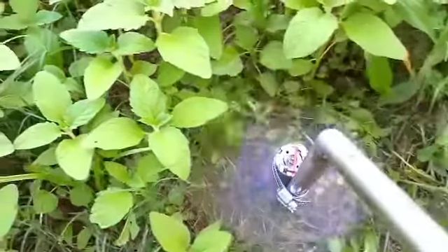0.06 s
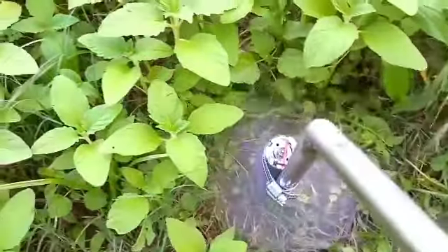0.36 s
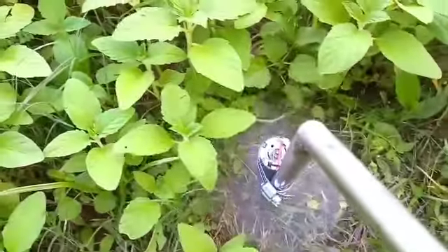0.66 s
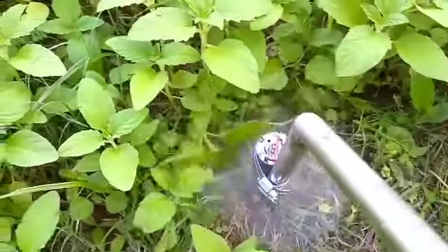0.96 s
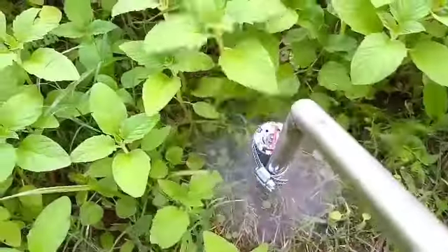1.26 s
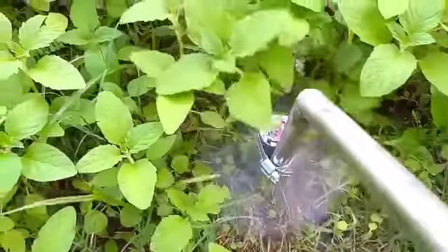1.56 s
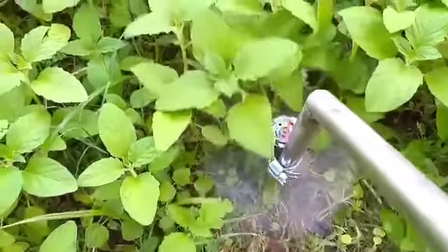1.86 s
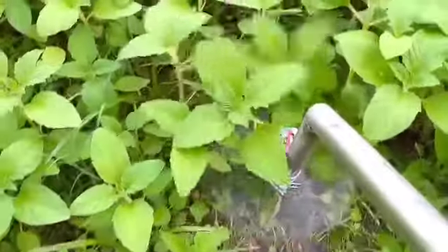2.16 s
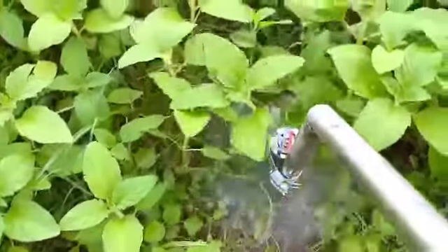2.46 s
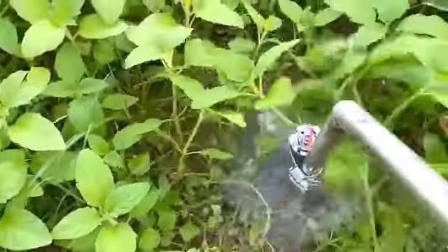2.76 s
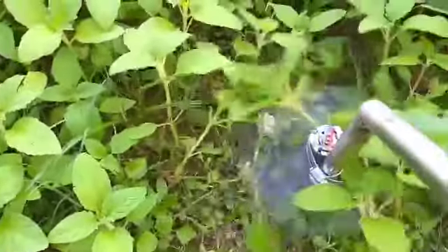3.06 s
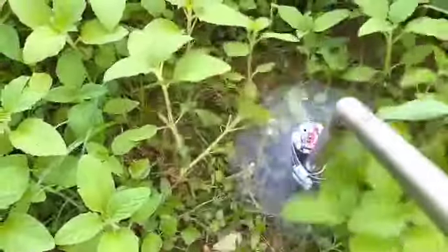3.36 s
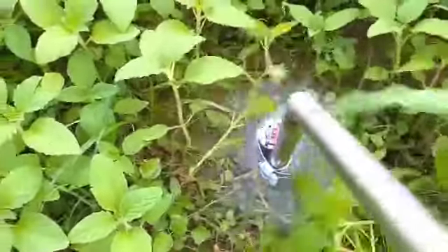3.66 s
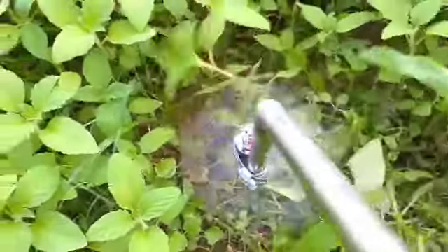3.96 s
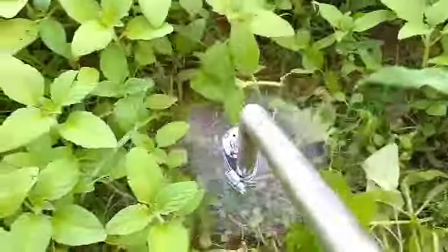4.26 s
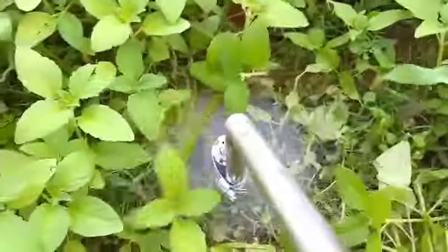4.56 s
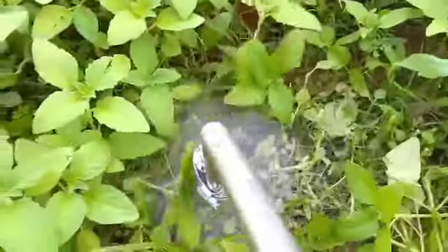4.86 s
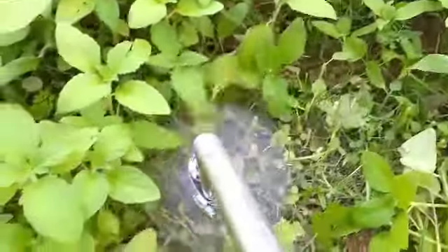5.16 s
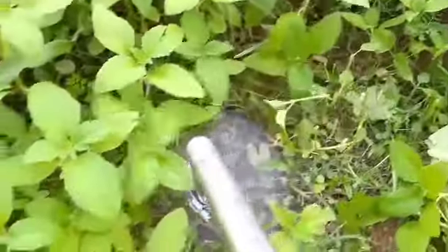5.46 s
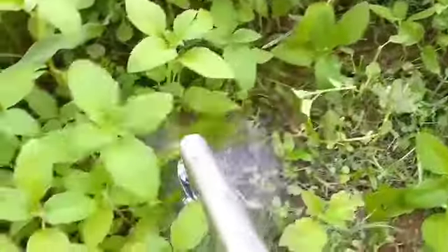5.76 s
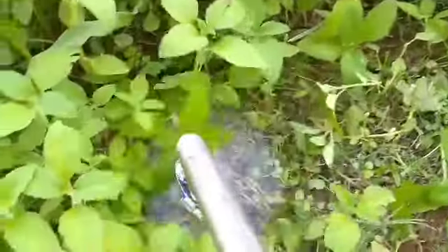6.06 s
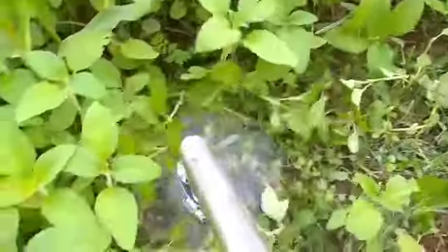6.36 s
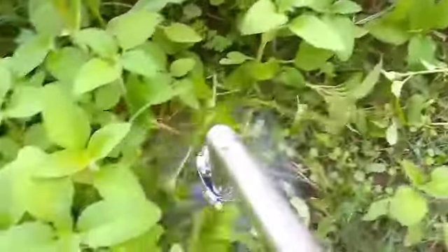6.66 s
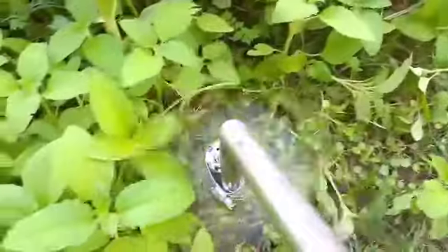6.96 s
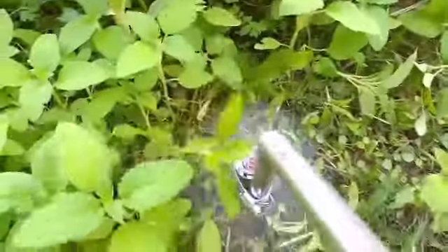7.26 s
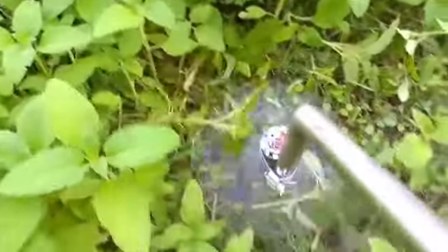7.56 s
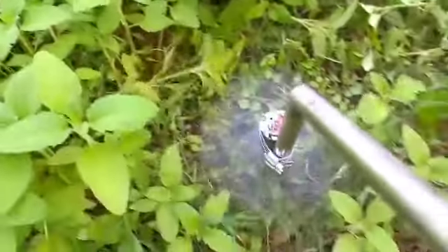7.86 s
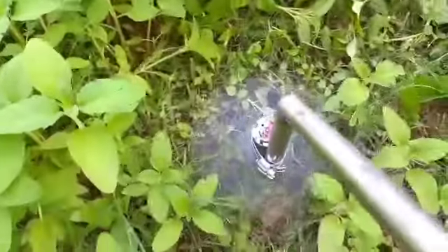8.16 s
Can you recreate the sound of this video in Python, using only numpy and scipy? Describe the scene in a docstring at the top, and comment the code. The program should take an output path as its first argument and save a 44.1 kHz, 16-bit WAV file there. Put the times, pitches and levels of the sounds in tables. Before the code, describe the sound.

Heard close up outdoors and leaning to the left, a spinning cutter chops leafy weeds without a pause. High metallic ringing and rattling ride over a scratchy, sizzling sound of torn leaves. Stalks knock against the cutter at irregular moments, with tiny squeals and a few dull bumps. The small electric motor's hum wavers from the start, grows stronger and cleaner midway, then sags again as the trimmer bites into more growth.

```python
"""Home-made grass trimmer in weeds

Outdoors, close to a pair of microphones, a small electric motor on a metal tube is swept through weeds.
The spinning cutter hums and sags under load; its chatter echoes along the tube and rings it in a row
of close lines. Leaves are shredded with a grainy rasp that grows with the thickness of the weeds and
with each tuft, and thicker stalks knock against the cutter."""
import sys
import numpy as np
from scipy import signal
from scipy.fft import rfft, irfft
from scipy.io import wavfile
from scipy.ndimage import uniform_filter1d

SR = 44100
rng = np.random.default_rng(int(sys.argv[2]) if len(sys.argv) > 2 else 0)


def digitize_waveform(pressure):
    """Quantize a signal to 16-bit integers and store it at the path in sys.argv[1].

    Rows of a 2-D input are taken as channels; values are limited to [-1, 1].
    """
    field = np.atleast_2d(pressure).T
    bounded = np.clip(field, -1, 1)
    quanta = np.round(bounded * 32767).astype(np.int16)
    wavfile.write(sys.argv[1], SR, quanta)


N = 366912
TIME = np.arange(N) / SR
FREQS = np.maximum(np.arange(N // 2 + 1) * SR / N, 1)


def from_db(db):
    """Decibels to gain."""
    return 10 ** (np.asarray(db) / 20)


def rms_one(x):
    """Scale so that the mean of the channels has rms 1."""
    return x / np.sqrt(np.mean(np.atleast_2d(x).mean(axis=0) ** 2) + 1e-20)


def over_hz(points):
    """A table of frequencies read at every bin."""
    hz, value = np.transpose(points)
    return np.interp(np.log(FREQS), np.log(hz), value)


def drift(rate_hz):
    """A smooth random wander with spread 1."""
    return rms_one(irfft(rfft(rng.standard_normal(N)) / (1 + (FREQS / rate_hz) ** 2), N))


def swell(s, half_s):
    """A smooth rise and fall around one moment."""
    return np.exp(-np.minimum(((TIME - s) / half_s) ** 2 / 2, 20))


def burst(s, fade_s):
    """A force that jumps up at one moment and dies away."""
    return np.exp(-np.clip(TIME - s, 0, 1) / fade_s) * (TIME >= s)


def colour(x, spectrum):
    """Give a sound a spectrum."""
    return irfft(rfft(x) * from_db(over_hz(spectrum)), N)


def resonate(x, hz, width_hz):
    """One resonance with gain 1 at its peak."""
    r = np.exp(-np.pi * width_hz / SR)
    feedback = [1, -2 * r * np.cos(2 * np.pi * hz / SR), r * r]
    return signal.lfilter(np.array([1, 0, -1]) * (1 - r * r) / 2, feedback, x + 1e-18)


def body(drive, modes, wander_db, skirt_hz):
    """Modes whose shares shift as the contact point moves; each takes only the drive near its pitch."""
    return sum(from_db(db + wander_db * drift(16.4)) * resonate(resonate(drive, hz, width), hz, skirt_hz)
               for hz, width, db in modes)


# The left microphone hears more of the trimmer: (frequency [Hz], left minus right [dB])
MIC_LEAN = [(80, 4), (200, 9), (700, 4), (1300, 9), (2200, 7), (3200, 9), (5000, 14), (5900, 16),
            (6500, 10), (7100, 2), (10500, .5), (11500, 7)]
# How alike the two microphones hear it: (frequency [Hz], correlation [0-1])
MIC_LIKENESS = [(100, 0.17), (1300, 0.54), (2300, 0.1), (2800, 0.38), (3500, 0.16), (6000, 0.078),
                (7200, 0.38), (8500, 0.76), (14000, 0.15)]

def at_microphones(pair):
    """Two unrelated versions of a sound become left and right, partly alike and leaning left."""
    alike, lean = over_hz(MIC_LIKENESS), from_db(over_hz(MIC_LEAN))
    common, apart = rfft(pair)
    both = np.sqrt(1 + alike) * common + np.sqrt(1 - alike) * apart * [[1], [-1]]
    return rms_one(irfft(both * np.array([lean, np.ones_like(lean)]) / np.hypot(lean, 1), N))


def held_at(sound, db, span_s=.31):
    """Even out a sound at the microphones, keeping grain faster than the span, then set its level."""
    pair = at_microphones(sound)
    power = uniform_filter1d(np.mean(pair ** 2, axis=0), int(span_s * SR) + 1)
    return from_db(db) * rms_one(pair / np.sqrt(np.abs(power) + 1e-20))


# The patch of weeds where the cutter is swept: (time [s], thickness [dB])
WEED_THICKNESS = [(0.0, 2.5), (0.25, -3), (0.56, -4.5), (1.29, -0.37), (1.8, 1.9), (2.3, 2.5), (2.82, 1.7),
                  (3.7, 0.73), (4.1, -2), (4.6, -0.5), (5.05, 0), (6.05, 0.5), (6.78, 2.56), (7.1, -2),
                  (7.5, -4), (7.9, 3), (8.03, -2), (8.31, -3.5)]
# Tufts in its path: (time [s], length [s], extra shaking of the tube [dB], extra leaves [dB])
TUFTS = [(-.03, 0.12, 3.5, 1), (0.694, 0.12, 5, 0.5), (0.834, 0.1, 9, 5), (1.36, 0.079, 5, 3),
         (1.53, 0.41, 4, 0.2), (2.683, 0.33, 2, 2), (3.25, 0.21, 3.5, 3), (3.624, 0.096, 4, 3.5),
         (3.96, 0.2, 4, -2), (4.282, 0.067, 4, 0.5), (4.769, 0.035, 8, 8.5), (5.022, 0.066, -3, 5.5),
         (5.182, 0.1, 1, 4.5), (5.491, 0.13, 2.5, 3), (5.836, 0.31, 5, 4.5), (6.537, 0.27, 2.5, 0.5),
         (6.934, 0.18, 5, 1), (7.71, 0.14, 6.5, 2), (8.054, 0.46, 5.5, 2.5)]

def growth(attack_s=.02, release_s=.014):
    """Weed thickness, and the shaking and leaves added as each tuft is drawn in and cleared, in dB."""
    shake_db, leaves_db = np.zeros((2, N))
    for s, length_s, shake, leaves in TUFTS:
        drawn_in = np.clip((TIME - s) / attack_s, 0, 1)
        bite = drawn_in * np.exp(-np.clip(TIME - s - length_s, 0, 1) / release_s)
        shake_db += shake * bite
        leaves_db += leaves * bite
    return np.interp(TIME, *np.transpose(WEED_THICKNESS)), shake_db, leaves_db


def clumps(per_s, clear_s):
    """Leaves meet the cutter suddenly, in clumps of random size, and are soon cleared; spread about 1."""
    arrivals = (rng.random(N) < per_s / SR) * rng.uniform(.081, 1, N)
    load = np.sqrt(signal.lfilter([1], [1, -np.exp(-1 / (clear_s * SR))], arrivals + 1e-18))
    return 2 * np.tanh(rms_one(load - load.mean()) / 2)


def chatter(turns, uneven_db, contact_s, rub):
    """Both cutter ends make one scratchy contact per turn, of random strength, over steady rubbing."""
    touches = np.diff(np.floor(2 * turns + .22 * drift(150)), prepend=0) > 0
    force = touches * from_db(uneven_db * np.clip(rng.standard_normal(N), -3, 2))
    pressure = signal.lfilter([1], [1, -np.exp(-1 / (contact_s * SR))], force + 1e-18)
    return (rms_one(pressure) + rub) * rng.standard_normal((2, N))


# Low rumble of the air around the cutter: (frequency [Hz], level [dB])
AIR_SPECTRUM = [(15, -38), (40, -17), (90, 8), (135, 9), (180, 1), (330, -25)]
# Dull bumps of the trimmer head: (time [s], level [dB])
HEAD_BUMPS = [(1.848, -47), (3.0, -45), (5.349, -41), (6.001, -45), (7.828, -46)]

def buffeting(tearing, brushing, air_db):
    """The cutter buffets the air in uneven gusts, and its head bumps now and then."""
    rumble = at_microphones(colour(tearing, AIR_SPECTRUM))
    thud = at_microphones(colour(brushing, THRASH_SPECTRUM))
    bumps = sum(from_db(db) * burst(s, fade_s=.023) for s, db in HEAD_BUMPS)
    return from_db(air_db + 3.8 * drift(7.9)) * rumble + bumps * (rumble + thud)


# Broad leaves slapped, and soft leaves torn: (time [s], level [dB])
LEAF_SLAPS = [(1.42, -43.5), (1.914, -41.5), (2.324, -45), (2.773, -41), (3.313, -39.5), (5.034, -48),
              (6.791, -45), (6.991, -45), (7.848, -38)]
LEAF_SPRAYS = [(.018, -27), (.499, -35), (.748, -33), (.832, -31), (3.773, -26.5), (5.728, -28),
               (6.063, -29), (6.363, -27), (7.088, -26)]

def single_leaves(knocks, tearing, brushing):
    """A broad leaf passes through the cutter with a dull flap, a soft one with a hissing spray."""
    flap = at_microphones(colour(knocks, THRASH_SPECTRUM))
    spray = at_microphones(colour(brushing, HISS_SPECTRUM) + colour(tearing, SIZZLE_SPECTRUM))
    return (flap * sum(from_db(db) * swell(s, half_s=.03) for s, db in LEAF_SLAPS)
            + spray * sum(from_db(db) * swell(s, half_s=.019) for s, db in LEAF_SPRAYS))


# Foliage being cut at close range, from dull to bright: (frequency [Hz], level [dB])
THRASH_SPECTRUM = [(160, -7), (260, 9), (400, 11.5), (490, 5), (800, 6), (1200, -27)]
RASP_SPECTRUM = [(680, -63), (880, -4.5), (1100, -5), (1500, 3.5), (1900, 1), (2400, -0.5), (3500, 3),
                 (5200, -4), (6600, 6), (7300, -31), (8200, -37)]
SIZZLE_SPECTRUM = [(6000, -18.5), (7100, -2), (7600, -5.5), (8600, 15.5), (9300, -3.5), (9900, 7.5),
                   (10700, 6), (11600, -18)]
HISS_SPECTRUM = [(10200, -48), (11400, 17), (12300, 9), (12900, 13.5), (13300, 16.5), (14600, 1.5)]

def shredding(tearing, brushing, thrash_db, rasp_db, hiss_db):
    """Torn and brushed leaves give a dull thrash, a grainy rasp and a flickering sizzle and hiss."""
    return (held_at(colour(tearing, THRASH_SPECTRUM), thrash_db)
            + held_at(colour(tearing, RASP_SPECTRUM), rasp_db)
            + held_at(colour(brushing, SIZZLE_SPECTRUM), hiss_db + 1.53 * drift(36) - .5)
            + held_at(colour(tearing, HISS_SPECTRUM), hiss_db + .6 * drift(18) - .4))


# Resonances of the housing: (frequency [Hz], width [Hz], level [dB])
HOUSING_MODES = [(716.6, 28, -12.5), (1088, 30.5, -4), (1187, 10, -4), (1303.6, 8.8, 2.5), (1804, 32, -3.5),
                 (1945, 53, -3.5), (2092, 31, -5.5), (2183, 29, -3)]

def housing(knocks, db):
    """The cutter's knocks ring the housing in the midrange."""
    return held_at(body(knocks, HOUSING_MODES, wander_db=2.5, skirt_hz=260), db)


# Brief tones, mostly in the left microphone: (time [s], level [dB], frequency [Hz], half length [s])
BRIEF_TONES = [(0.03, -30.5, 2720, 0.047), (.51, -35.5, 2780, 0.014), (0.903, -30.5, 2755, 0.017),
               (1.414, -28, 4910, 0.024), (1.417, -23, 2820, 0.01), (2.358, -37, 1106, 0.1),
               (2.722, -36, 1069, 0.052), (2.783, -27, 4210, 0.011), (2.927, -30, 2740, 0.018),
               (3.274, -27, 2740, 0.018), (5.53, -27.5, 4310, .016), (3.7, -40, 719, 0.058),
               (4.8, -33, 3781, 0.051), (6.806, -39, 1093, 0.019), (7.02, -39, 1300, .026),
               (7.794, -24.5, 2802, 0.0067), (7.855, -25.5, 2826, 0.0084), (7.936, -22, 2774, 0.0074),
               (8.103, -20, 4890, .003), (8.106, -29, 4284, 0.012), (8.107, -27, 2793, .006)]

def brief_tones(waver_rad=.38):
    """The metal squeals, or the hum's third harmonic swells for a moment; each tone wavers slightly."""
    waver = waver_rad * drift(43)
    tones = np.zeros(N)
    for s, db, hz, half_s in BRIEF_TONES:
        near = np.abs(TIME - s) < 3 * half_s
        phase = 2 * np.pi * hz * TIME[near] + waver[near]
        tones[near] += from_db(db) * swell(s, half_s)[near] * np.sin(phase)
    return tones * from_db([[5], [-5]])


# Thicker stalks striking the cutter: (time [s], level [dB], drag time [s])
STALK_BLOWS = [(.346, -25, .008), (1.041, -24, .012), (1.149, -21, .012), (1.523, -15, .02),
               (1.627, -17.5, .012), (1.667, -15, .009), (2.932, -20, .012), (3.173, -18, .01),
               (4.785, -19, .02), (5.35, -12.5, .005), (5.596, -17, .012), (6.013, -19, .012),
               (6.483, -20, .018), (6.596, -16, .008), (6.863, -12.5, .009), (7.374, -21.5, .022),
               (8.101, -15, .006)]

def stalks(crack_db=-12, ring_db=-1, thud_db=-25):
    """A stalk snaps on the cutter with a dull thud and drags on it for a few turns, ringing the tube."""
    force = sum(from_db(db) * burst(s, drag_s) for s, db, drag_s in STALK_BLOWS)
    scratch = rng.standard_normal((2, N))
    modes = TUBE_MAIN_MODES + TUBE_HIGH_MODES + TUBE_MID_MODES + TUBE_LOW_MODES
    ring = held_at(body(scratch, modes, wander_db=0, skirt_hz=600), ring_db, span_s=.004)
    crack = at_microphones(colour(scratch, RASP_SPECTRUM) + colour(scratch, HISS_SPECTRUM))
    thud = at_microphones(colour(scratch, THRASH_SPECTRUM))
    return force * (from_db(crack_db) * crack + ring + from_db(thud_db) * thud)


def echoing(x, round_trips_hz, kept=.51):
    """Vibration runs up and down the tube, splitting each broad resonance into evenly spaced lines."""
    round_trip = kept * np.exp(-2j * np.pi * FREQS / round_trips_hz)
    return irfft(rfft(x) * np.sqrt(1 - kept ** 2) / (1 - round_trip), N)


# Resonances of the metal tube, heard close by: (frequency [Hz], width [Hz], level [dB])
TUBE_LOW_MODES = [(2731, 22, 5.5), (2793, 32.5, 4), (3132, 26, 4.5), (3695, 14, 3.5), (3818, 14, 3),
                  (4210, 26, 6), (4275, 35, 5.8)]
TUBE_MID_MODES = [(4860, 99, 6.8)]
TUBE_MAIN_MODES = [(5803, 210, 23), (6007, 190, 19)]
TUBE_HIGH_MODES = [(6220, 700, -11), (6430, 650, -2), (6960, 750, 0.5)]

def tube(knocks, ring_db, shred_db, feed_db, rattle_db):
    """The cutter's knocks echo along the tube and ring it; the highest waves run faster."""
    echoes = echoing(knocks, round_trips_hz=70.95)
    fast_echoes = echoing(knocks, round_trips_hz=72.36)
    low = body(knocks, TUBE_LOW_MODES, wander_db=1.5, skirt_hz=330)
    mid = body(echoes, TUBE_MID_MODES, wander_db=1.5, skirt_hz=330)
    main = body(echoes, TUBE_MAIN_MODES, wander_db=0, skirt_hz=600)
    high = body(fast_echoes, TUBE_HIGH_MODES, wander_db=4.5, skirt_hz=700)
    return (held_at(low + mid, .29 * ring_db + .68 * shred_db + .5 * (feed_db + rattle_db) + 1.9)
            + held_at(main, ring_db + rattle_db + .5 * feed_db)
            + held_at(high, shred_db + rattle_db + 3.5))


# Tough growth braking the motor: (time [s], speed lost [Hz], half length [s])
MOTOR_SAGS = [(0.057, 18.3, 0.17), (2.247, 5.33, 0.057), (2.799, 14.5, .1), (3.358, 13.1, .18),
              (3.7, 14.7, .055), (6.62, 20.4, 0.22), (8.109, 5.8, .14)]

def motor(free_speed_hz=368.2):
    """Turns made and speed lost as the motor is braked and recovers; its inertia rounds each dip."""
    sag_hz = sum(lost_hz * swell(s, half_s) for s, lost_hz, half_s in MOTOR_SAGS)
    return np.cumsum(free_speed_hz - sag_hz) / SR, sag_hz


# Partials of the cutter's hum: (multiple of the turning rate, level [dB])
HUM_PARTIALS = [(1, 1), (2, -25), (3, -14.5)]
# The hum at the microphones, choked by each heavy bite: (time [s], level [dB])
HUM_LEVEL = [(0.0, -44), (0.07, -48), (0.19, -68), (0.25, -56), (0.36, -48), (0.5, -44), (0.68, -53.5),
             (0.92, -40.5), (1.2, -38), (1.31, -45.5), (1.55, -36.5), (1.84, -33), (1.88, -38),
             (2.05, -36.5), (2.33, -39.5), (2.8, -44.5), (3.22, -48), (3.27, -37.5), (3.4, -48.5),
             (3.6, -40), (3.75, -48), (3.8, -64), (3.9, -41.5), (4.2, -39), (4.68, -28.5), (5.1, -26.5),
             (5.32, -29), (5.36, -32.5), (5.96, -31), (6.09, -55), (6.16, -44), (6.5, -39.5), (7.04, -58),
             (7.13, -43.5), (7.35, -46.5), (7.41, -38), (7.7, -37.5), (7.91, -36), (8.02, -56.5),
             (8.31, -52.5)]
# Stems choking it for an instant: (time [s])
STEM_CHOKES = [.315, .57, 1.67, 2.125, 2.5, 2.74, 3.65, 6.4, 6.655, 7.82, 8.05]

def cutter_hum(turns, sag_hz, weeds_db, full_strain_hz=33.2, flutter_db=7, wobble_rad=.53):
    """The cutter's hum is clean when it runs free, and stutters as leaves brake and ruffle it."""
    hum_db = np.interp(TIME, *np.transpose(HUM_LEVEL))
    choke_db = -12 * sum(swell(s, half_s=.014) for s in STEM_CHOKES)
    ruffle = from_db(-44 + 1.4 * weeds_db - hum_db)  # greatest with a weak hum in thick weeds
    strain = np.clip(sag_hz / full_strain_hz + ruffle, 0, 1)
    phase = 2 * np.pi * turns + wobble_rad * strain * drift(13)
    phase = phase + np.array([[0], [.58]])  # the right microphone leads
    tone = 0
    for order, db in HUM_PARTIALS:
        lean_db = np.array([[3], [-4]]) * (order > 1)  # overtones lean left
        stutter_db = flutter_db * strain * np.tanh(drift(23))
        tone += from_db(db + lean_db + stutter_db) * np.sin(order * phase)
    return from_db(hum_db + choke_db) * np.sqrt(2) * tone


def scene():
    """Buffeted air, shredded leaves, stalk blows, ringing metal and hum, all close to the microphones."""
    turns, sag_hz = motor()
    weeds_db, shake_db, leaves_db = growth()
    feed_db = clumps(per_s=40, clear_s=.022)
    rattle_db = 1.9 * clumps(per_s=70, clear_s=.006)  # small hard hits on the metal
    knocks = chatter(turns, uneven_db=-1.5, contact_s=.00022, rub=.9)
    tearing = chatter(turns, uneven_db=1.5, contact_s=.00041, rub=1)
    brushing = chatter(turns, uneven_db=14.5, contact_s=.012, rub=.55)
    # Each sound grows at its own rate in thicker weeds, the dull thrash fastest.
    air_db = -61 + .97 * weeds_db + .098 * leaves_db + .24 * sag_hz  # a braked cutter buffets harder
    thrash_db = -56.5 + 2.8 * weeds_db + leaves_db + 2.2 * feed_db
    shred_db = -40.5 + .83 * weeds_db + leaves_db
    rasp_db = shred_db + feed_db + .5 * rattle_db + 3.5
    hiss_db = -35.5 + .46 * weeds_db + leaves_db + feed_db
    housing_db = -41 + 1.5 * weeds_db + .5 * leaves_db + feed_db
    ring_db = -29 + 1.71 * weeds_db + shake_db
    return (buffeting(tearing, brushing, air_db)
            + single_leaves(knocks, tearing, brushing)
            + shredding(tearing, brushing, thrash_db, rasp_db, hiss_db)
            + housing(knocks, housing_db) + brief_tones() + stalks()
            + tube(knocks, ring_db, shred_db, feed_db, rattle_db)
            + cutter_hum(turns, sag_hz, weeds_db))


def record(dry, cutoff_hz=14720):
    """The treble has two narrow dips; the top is cut."""
    for hz, q in [(7980, 4.8), (9350, 90)]:
        dry = signal.lfilter(*signal.iirnotch(hz, q, fs=SR), dry)
    return signal.sosfilt(signal.ellip(12, .1, 85, cutoff_hz, fs=SR, output="sos"), dry)


dry = scene()
out = record(dry)
digitize_waveform(out)
```